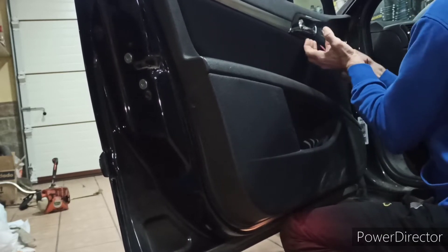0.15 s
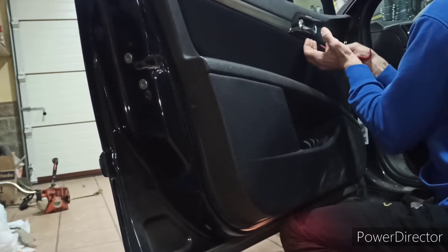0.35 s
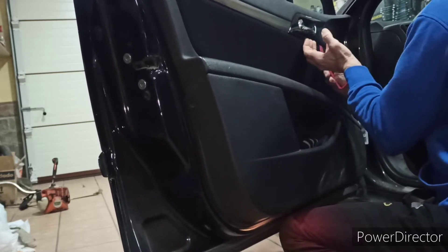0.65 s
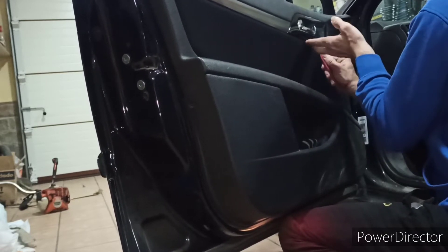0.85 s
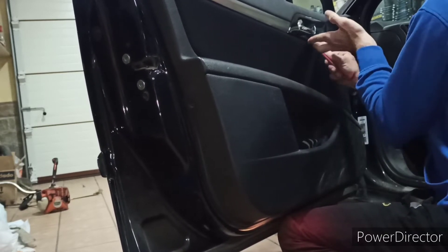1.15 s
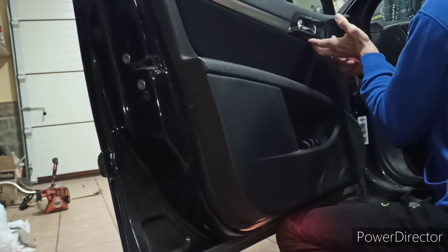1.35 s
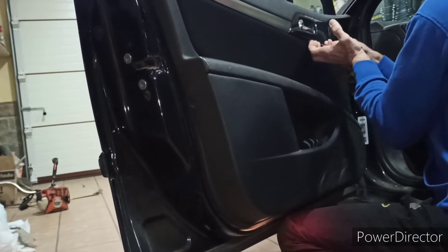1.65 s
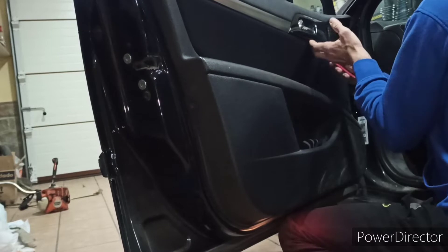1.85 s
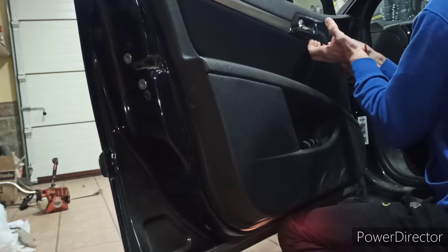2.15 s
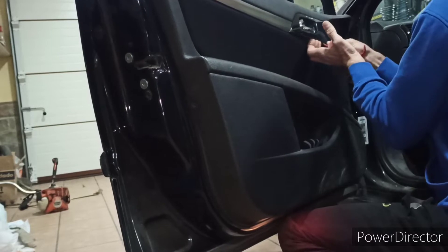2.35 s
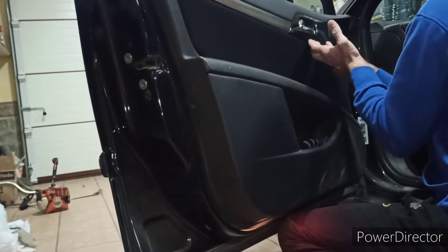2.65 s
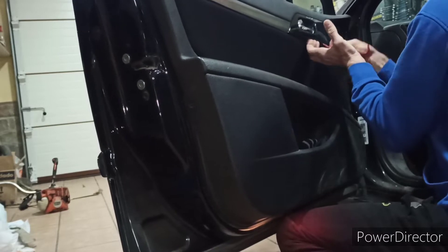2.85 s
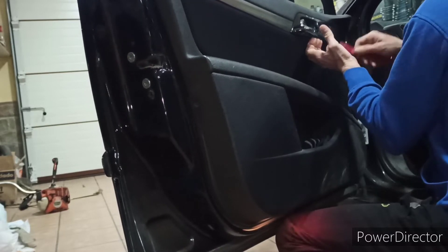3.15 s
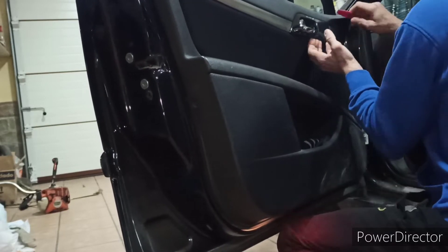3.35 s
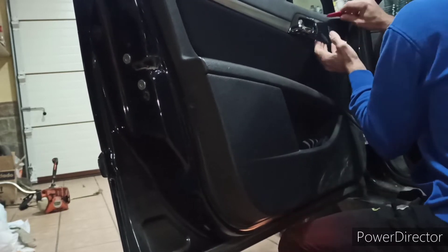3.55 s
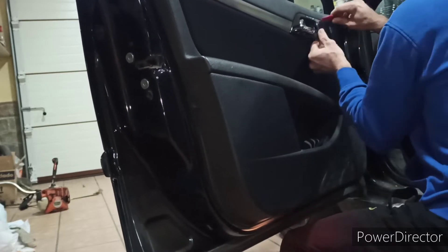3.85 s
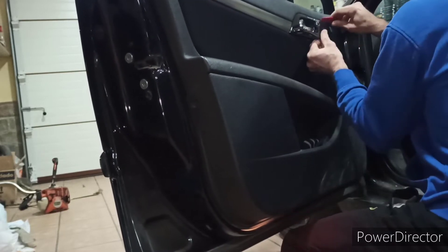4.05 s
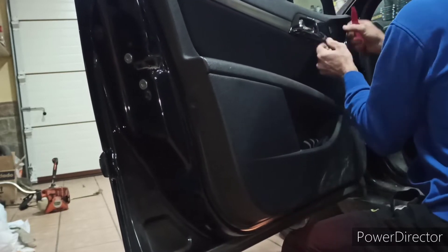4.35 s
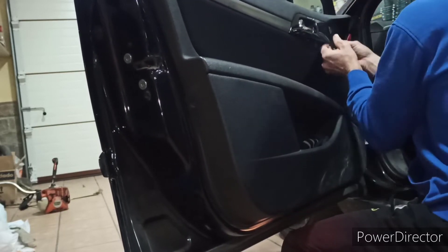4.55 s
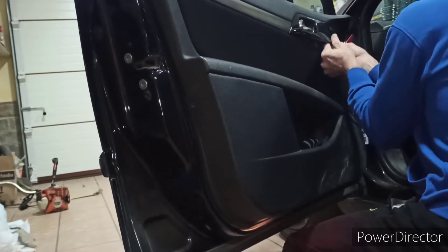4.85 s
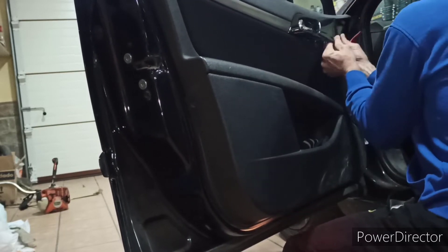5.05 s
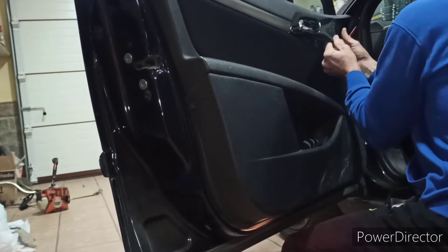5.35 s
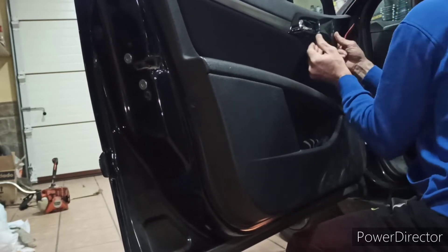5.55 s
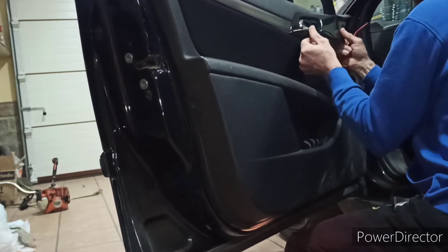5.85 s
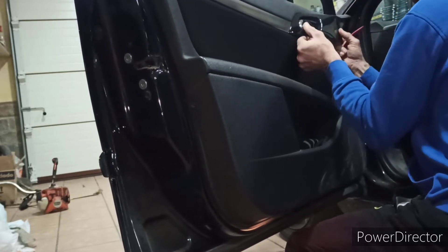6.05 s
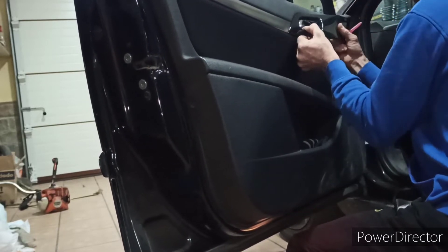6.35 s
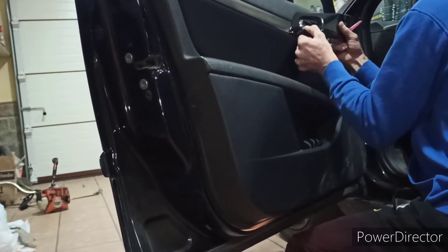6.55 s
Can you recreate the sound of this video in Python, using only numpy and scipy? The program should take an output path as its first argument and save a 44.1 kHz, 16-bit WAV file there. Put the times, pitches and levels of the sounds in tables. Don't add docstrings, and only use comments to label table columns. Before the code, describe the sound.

A tiled garage with faint steady hum and hiss; a phone about two metres from a car door. From 0 to 1.5 s, faint finger rubbing, soft knuckle bumps on the hollow panel and small taps. At 1.58 a loud sharp clip snap with a door thump, followed by a short rough scrape to 1.7. Light clicks at 2.0, a hard bright click at 2.27, then quiet taps and a tiny low squeak at 2.8. A crisp snap at 3.24, a soft sleeve swish at 3.45, small rattles near 3.8. At 4.04-4.09 a rapid run of clips cracks open. A higher squeak rises from 4.5 to 4.7. The loudest snaps come at 5.15 and 5.2, ringing plastic and booming door. Small rattles at 5.57 and 5.7, bumps at 6.2, a moderate last release at 6.29, then light rubbing to about 6.7. Hard walls give each hit a diffuse half-second tail.

```python
import sys
import numpy as np
from scipy import signal
from scipy.fft import rfft, irfft, next_fast_len
from scipy.io import wavfile
from scipy.ndimage import uniform_filter1d, minimum_filter1d, map_coordinates

SR = 44100
rng = np.random.default_rng(int(sys.argv[2]) if len(sys.argv) > 2 else 0)


def wrap_up_sound(samples):
    columns = np.atleast_2d(samples).T
    tamed = np.clip(columns, -1, 1)
    steps = np.round(tamed * 32767).astype(np.int16)
    wavfile.write(sys.argv[1], SR, steps)


def invert_db(level):
    return 10 ** (np.asarray(level, dtype=float) / 20)


N = 295029
LENGTH = 2048

# f/Hz, width/Hz, level/dB
DOOR_MODES = [(112, 49, -5.5), (188.7, 4.7, 5.5), (255.2, 21, 1), (335, 18, -8), (412, 23, 1)]
# f/Hz, width/Hz, level/dB
TRIM_MODES = [(504, 170, -2), (625, 107, 2.5), (770, 86, 2), (1080, 156, 2), (1185, 340, -2.5),
              (2180, 810, -16)]
# f/Hz, level/dB
CRACK_COLOUR = [(700, -1), (1300, 4.5), (2500, 1.5), (4500, 1), (6000, -2.5), (9000, -12), (12000, -16.5),
                (16000, -19)]


def unit(x):
    return x / np.sqrt(np.mean(np.abs(x) ** 2) + 1e-20)


def peak_one(x):
    return x / np.abs(x).max(axis=-1, keepdims=True)


def along(points, hz):
    f, v = np.transpose(points)
    return np.interp(np.log(hz + 1), np.log(f + 1), v)


def curves(rows, outside):
    s, *cols = np.transpose(rows)
    return [np.interp(np.arange(N) / SR, s, c, outside, outside) for c in cols]


def wobble(rate):
    knots = rng.standard_normal(int(N * rate / SR) + 4)
    return map_coordinates(knots, [np.arange(N) * rate / SR])


def filtered(x, response):
    n = x.shape[-1]
    m = next_fast_len(n + 1024, True)
    return irfft(rfft(x, m) * response(np.fft.rfftfreq(m, 1 / SR)), m)[..., :n]


def resonance(f, hz, width):
    return 1j * f * width / (hz * hz - f * f + 1j * f * width)


def body(modes):
    return lambda f: sum((-1) ** k * invert_db(db) * resonance(f, hz, w) for k, (hz, w, db) in enumerate(modes))


def spread(pair):
    # f/Hz, left-right likeness -1 to 1
    alike = [(30, 0.85), (60, 0.85), (130, 0.93), (290, 0.76), (640, 0.38), (1400, -0.25), (5000, 0.13),
             (15000, 0.02)]
    turn = lambda f: np.arccos(np.clip(along(alike, f), -1, 1)) / 2
    mid, side = filtered(pair, lambda f: np.sqrt(2) * np.array([np.cos(turn(f)), np.sin(turn(f))]))
    return np.array([mid + side, mid - side]) / np.sqrt(2)


def strokes(rows):
    build_up_db, fade_db_s = 12.5, 140
    s, build, *db = np.transpose(rows)[:, :, None]
    t = np.arange(0, N, 64) / SR
    ahead = (s - t) / np.clip(build, .002, 1)
    rise = invert_db(-build_up_db * np.abs(ahead)) * (ahead < 1)
    fall = invert_db(-fade_db_s * np.abs(t - s))
    shape = np.where(ahead > 0, rise, fall)
    return [np.interp(np.arange(N) / SR, t, np.sum(invert_db(d) * shape, axis=0)) for d in db]


def burst(s, life, colour):
    t = np.arange(LENGTH) / SR
    noise = rng.standard_normal((len(s), 3, len(t))).swapaxes(0, 1)
    ports = (noise[0] + 0.72 * noise[1:]) * (1 - np.exp(-t / 0.000083)) * np.exp(-t / life)
    ports = filtered(ports, colour)
    ports = ports / np.abs(ports).max(axis=(0, 2), keepdims=True)
    even = filtered(1. * (np.arange(len(t)) == 64), colour)
    even = even / np.linalg.norm(even) * np.linalg.norm(ports[0], axis=1, keepdims=True)
    return np.array([*ports, even])


def place(s, rows):
    spots = 4
    at = np.round(s * SR).astype(int) + np.arange(rows.shape[-1])
    spot = np.argsort(np.argsort(s[:, 0])) % spots
    add_up = lambda r, take: np.bincount(at[take].ravel(), r[take].ravel(), N + rows.shape[-1])[:N]
    direct = [add_up(r, spot >= 0) for r in rows[:2]]
    return np.array(direct + [add_up(rows[2], spot == k) for k in range(spots)])


def background():
    # f/Hz, level/dB per Hz
    hum = [(15, -35.5), (25, 7.5), (43, -1), (103, 13), (307, 1.5), (421, 0.5), (812, -4), (2150, -16.5),
           (4570, -13.5), (5290, -17.5), (7440, -22.5), (8400, -23.5), (10900, -48), (18500, -120)]
    # f/Hz, level/dB per Hz
    hiss = [(11500, -22.5), (15500, -19)]
    air = filtered(rng.standard_normal((2, N)), lambda f: invert_db(along(hum[:-2] + hiss, f)))
    drift_db = 1.1 * wobble(5) + .7 * wobble(13)
    return invert_db(-57.5 + drift_db) * unit(spread(air))


def garage(x, gap=.003):
    # f/Hz, t60/s
    t60 = [(100, 0.58), (260, 0.56), (700, 0.53), (1840, 0.6), (4850, 0.54), (12800, 0.31)]
    size, long = 14000, 28000
    out = np.zeros((2, N + 2 * SR))
    hz, t, z = signal.stft(rng.standard_normal((N // size + 1, 2, long)), SR, nperseg=256)
    tails = signal.istft(z * invert_db(-60 * t / along(t60, hz)[:, None]), SR, nperseg=256)[1]
    tails = tails * (1 - np.exp(-np.arange(tails.shape[-1]) / SR / 0.00022))
    tails = tails / np.linalg.norm(tails, axis=2, keepdims=True)
    late = round(gap * SR)
    for k in range(len(tails)):
        own = tails[(k + np.arange(len(x))) % len(tails)]
        wet = signal.fftconvolve(x[:, None, k * size:(k + 1) * size], own, axes=2).sum(axis=0)
        out[:, k * size + late:][:, :wet.shape[1]] += wet
    return spread(out[:, :N])


def swishes():
    # t/s of the strongest pull, build-up/s, level/dB
    brushes = [
        (0.23, 0.045, -84),
        (1.2, 0.056, -84),
        (3.435, 0.042, -65.5),
        (3.65, 0.071, -66),
        (3.72, 0.032, -76),
        (4.088, 0.022, -49),
        (5.535, 0.1, -61),
    ]
    # f/Hz, level/dB
    sleeve = [(5200, -25), (6300, -8.5), (7400, -4), (8000, -10), (9000, -18.5)]
    cloth = rng.standard_normal(N) * invert_db(8.7 * wobble(180))
    return strokes(brushes)[0] * unit(filtered(cloth, lambda f: invert_db(along(sleeve, f))))


def rubbing():
    # t/s of the strongest pull, build-up/s, rub level/dB, rustle level/dB
    pulls = [(0.0, .05, -54.5, -63), (0.098, 0.093, -58.5, -55), (0.235, 0.054, -57, -72),
             (0.5, 0.063, -61, -90), (0.758, 0.049, -54.5, -85), (1.07, 0.0077, -48, -53.5),
             (1.2, 0.23, -58, -59), (1.42, 0.0042, -46.5, -69.5), (1.625, 0.052, -30, -26.5),
             (1.665, 0.043, -26.5, -28), (2.03, 0.045, -41.5, -53), (2.09, 0.043, -50.5, -64),
             (2.22, 0.11, -61.5, -65.5), (2.7, 0.34, -55, -66), (2.844, 0.087, -45.5, -49.5),
             (2.91, 0.0053, -55, -78), (3.03, 0.02, -54, -72.5), (3.518, 0.13, -57.5, -58.5),
             (3.7, 0.096, -66, -57), (3.824, 0.056, -55, -50.5), (4.03, 0.058, -60, -56),
             (4.62, 0.051, -69, -65), (4.78, 0.19, -62, -52), (5.05, 0.25, -52.5, -58),
             (5.41, 0.041, -48, -61), (5.49, 0.03, -69, -51.5), (5.8, 0.19, -82.5, -64),
             (6.044, 0.21, -72.5, -57), (6.204, 0.035, -62.5, -52), (6.5, 0.12, -60, -58),
             (6.69, 0.024, -42, -45)]
    heavy = rng.standard_normal(N) * invert_db(3.4 * wobble(70))
    fine = rng.standard_normal(N) * invert_db(2.6 * wobble(140))
    heavy = unit(filtered(heavy, lambda f: body(TRIM_MODES)(f) + body(DOOR_MODES)(f)))
    fine = unit(filtered(fine, lambda f: invert_db(along(CRACK_COLOUR, f))))
    rub, rustle = strokes(pulls)
    return invert_db(-2.5) * rub * heavy + invert_db(-8.0) * rustle * fine


def squeaks():
    # t/s, slip rate f/Hz, level/dB
    slips = [
        [(2.775, 813, -67), (2.8, 870, -57), (2.83, 1037, -49.5), (2.86, 1050, -68)],
        [(4.46, 1643, -77), (4.49, 1760, -61.5), (4.53, 1953, -56.5), (4.57, 2250, -45), (4.61, 2450, -41.5),
         (4.65, 2506, -39.5), (4.69, 2640, -40), (4.72, 2646, -58), (4.93, 2765, -68)],
    ]
    # f/Hz, level/dB
    thinnings = [
        [(800, -2), (1100, -5)],
        [(1700, 19), (2250, 5.5), (2450, 0), (2750, -6)],
    ]
    # f/Hz, level/dB
    edge = [(700, 8), (2850, 3), (3100, -26), (3350, -5), (4500, -1.5), (4950, -5.5), (5300, -14),
            (6000, -11), (6600, -7.5), (7500, -21.5), (8500, -18.5), (12000, -13)]
    wander, press = 0.139, .3
    out = np.zeros(N)
    scrape = unit(filtered(rng.standard_normal(N), lambda f: resonance(f, 3800, 900) ** 2 + 0.084))
    for rows, thinning in zip(slips, thinnings):
        hz, db = curves(rows, -200)
        over_db = along(thinning, np.abs(hz))
        unsteady = wander * invert_db(press * (db - db.max()))
        phase = 2 * np.pi * np.cumsum(hz * (1 + unsteady * np.tanh(wobble(600)))) / SR
        over = np.sin(2 * phase) + invert_db(-5) * np.sin(3 * phase) + invert_db(-4) * np.sin(4 * phase)
        flutter_db = 2.2 * wobble(250)
        tone = np.sin(phase) + invert_db(over_db) * over
        out += invert_db(db + flutter_db) * (tone + 1.8 * unsteady * scrape)
    return filtered(out, lambda f: invert_db(along(edge, f)))


def pings():
    # t/s, level/dB, f/Hz, life/ms
    tongues = [
        (5.181, -26, 13660, 11),
        (2.2665, -17.5, 2400, 2.3),
        (5.182, -21, 4600, 3),
        (3.2378, -20, 4200, 1),
        (0.358, -48, 420, 8),
        (2.82, -50, 2000, 4),
        (4.0445, -29, 9900, 5),
        (2.268, -25, 7500, 5.6),
        (5.1455, -25.5, 7700, 3.4),
    ]
    s, db, hz, ms = np.transpose(tongues)[:, :, None]
    t = np.arange(LENGTH) / SR
    ring = invert_db(db) * np.sin(2 * np.pi * hz * t) * np.exp(-t * 1000 / ms) * (1 - np.exp(-t / .0006))
    return place(s, np.array([ring, ring, invert_db(-3) * ring]))


def ticks():
    # t/s, peak of the top level/dB, peak of the lower sizzle level/dB
    releases = [(0.579, -44, -53), (1.034, -55, -53), (1.154, -53, -50.5), (1.197, -53, -58),
                (1.422, -56, -52.5), (1.445, -45, -60.5), (1.5793, -25, -22), (1.9998, -68, -58),
                (2.0246, -56, -44), (2.269, -34.5, -22.5), (2.6254, -67, -61), (2.9085, -51, -38.5),
                (3.238, -32.5, -56), (3.811, -40.5, -42), (4.024, -44, -52), (4.04, -28, -46.5),
                (4.0437, -12.5, -19), (4.047, -27, -31), (4.082, -31, -29.5), (4.0896, -31, -50),
                (4.312, -61, -52), (4.8347, -49.5, -51), (4.964, -50, -54), (5.1437, -16, -17.5),
                (5.1813, -19, -19.5), (5.1843, -20.5, -21.5), (5.199, -31, -28), (1.777, -49, -62),
                (4.938, -51, -58), (1.659, -51.5, -33), (5.5708, -46.5, -51.5), (6.277, -41, -42)]
    # f/Hz, level/dB
    tip_colour = [(8500, -49.5), (11500, -2.5), (13700, -3.5), (16000, -3)]
    # f/Hz, level/dB
    sizzle_colour = [(4500, -33.5), (6200, -9), (7500, -8.5), (8300, -12), (9500, -15.5), (12000, -37.5)]
    s, db, sizzle_db = np.transpose(releases)[:, :, None]
    tip = invert_db(db + 7.5) * burst(s, 0.0018, lambda f: invert_db(along(tip_colour, f)))
    sizzle = invert_db(sizzle_db + 6.0) * burst(s, 0.0021, lambda f: invert_db(along(sizzle_colour, f)))
    return place(s, tip + sizzle)


def contacts():
    # t/s, peak level/dB, trim ring f/Hz, crack level/dB, life/ms
    snaps = [(1.579, -9.5, 950, -8.5, 2.5), (3.2415, -22.5, 700, -16, 0.35), (4.044, -21, 840, -1, 3.8),
             (4.0478, -19.5, 1000, -1.5, 3.6), (4.069, -22.5, 815, -7, 19), (4.089, -25.5, 760, 1, 7.5),
             (5.1435, -14.5, 1500, -5, 2.1), (5.15, -9.5, 1030, -10, 2.4), (5.1575, -15.5, 518, -32.5, 4.5),
             (5.2, -10, 694, -15, 3.6), (5.2066, -5.5, 570, -37, 2.7), (6.2905, -24, 996, -23, 7.2),
             (6.292, -18.5, 620, -25, 6.6)]
    clicks = [(0.064, -44, 845, -18, 6.2), (1.312, -53, 686, -6, 2.3), (1.444, -32.5, 616, -1.5, 1.9),
              (2.0, -32.5, 790, -10.5, 7.6), (2.266, -6.5, 1450, -8, 0.89), (2.273, -15.5, 800, -28.5, 1.7),
              (2.778, -38, 745, -16, 1), (2.909, -29, 830, -9.5, 2.4), (3.2378, -18.5, 1780, -18, 1.7),
              (3.766, -35.5, 506, -23, 8.9), (3.767, -35, 990, -27, 4.6), (3.793, -38, 565, -25, 7.3),
              (3.8045, -28.5, 536, -20, 4.1), (3.811, -27, 1090, -10.5, 3.3),
              (4.938, -41.5, 1150, -7.5, 2.5), (4.985, -43, 1230, -11.5, 9), (5.572, -39.5, 875, -5, 3.2),
              (5.579, -35.5, 870, -28, 5.8), (5.6935, -33, 937, -20, 4.8), (5.7, -32, 980, -27.5, 1.9),
              (5.707, -49, 895, -24, 3.2), (6.2765, -37, 2350, -4, 11)]
    # t/s, peak level/dB, trim ring f/Hz, crack level/dB
    taps = [(0.591, -39, 595, -32), (1.034, -63, 579, 1), (1.423, -38.5, 906, -4.5), (1.456, -35, 504, -24),
            (1.482, -35, 433, -39), (2.0244, -36.5, 1713, -10.5), (2.629, -67.5, 533, 5),
            (2.674, -48, 528, -12), (2.6939, -39, 537, -17.5), (2.869, -45, 695, -9),
            (2.917, -35, 420, -32), (3.004, -42, 477, -24), (3.025, -39.5, 905, -24),
            (3.777, -37.5, 520, -29), (3.793, -43, 1015, -30), (4.889, -48, 675, -3),
            (4.962, -48, 1230, -12), (5.575, -37.5, 2460, -18), (6.283, -31.5, 500, -14)]
    # t/s, peak level/dB, trim ring f/Hz, crack level/dB
    thuds = [(0.208, -45.5, 503, -11), (0.226, -44, 705, -17), (0.607, -48.5, 810, -6),
             (0.357, -53.5, 454, -43), (0.371, -46, 270, -40), (0.578, -37.5, 800, -7.5),
             (0.718, -41, 557, -33), (0.733, -44, 300, -34), (0.742, -49, 547, -34),
             (0.76, -46.5, 543, -32), (0.787, -44, 262, -28), (0.806, -47.5, 1635, -25),
             (0.809, -37.5, 844, -21.5), (1.075, -53, 640, -18.5), (1.086, -44, 694, -30),
             (1.094, -37.5, 770, -32.5), (1.103, -38.5, 770, -16), (1.115, -41, 590, -33),
             (1.14, -43.5, 790, -28.5), (1.106, -43, 244, -29.5), (2.154, -38.5, 770, -35),
             (2.973, -35.5, 468, -16.5), (3.034, -36.5, 488, -30), (3.987, -38, 820, -19.5),
             (4.311, -40, 520, -3), (4.438, -42, 710, -10), (4.5827, -30.5, 440, -14),
             (4.595, -43, 188, -28), (4.62, -53, 420, -30), (4.665, -52, 150, -28),
             (4.688, -53, 480, -29.5), (4.837, -48, 793, -2), (4.873, -43, 830, -27),
             (6.187, -36, 486, -14), (6.197, -33.5, 193.5, -32.5), (6.21, -37, 170, -34)]
    rings = [(1.427, -41, 1850, -35, 3.7), (1.433, -40.5, 616, -34.5, 6.9), (1.4445, -29, 1770, -15, 2),
             (1.4455, -29.5, 980, -30, 6.9), (1.446, -31, 475, -29, 4.7), (1.481, -34, 940, -31.5, 7),
             (1.496, -41, 390, -32, 4.6), (1.5797, -4.5, 4060, -9.5, 0.47), (1.5885, -17, 490, -33, 3.6),
             (1.597, -26, 620, -27, 2.4), (1.605, -26, 600, -30, 3.5), (1.614, -32, 900, -15, 3.5),
             (1.628, -21, 341, -30, 16), (1.668, -19, 770, -28, 3), (1.68, -26, 350, -29, 8.8),
             (2.003, -29, 576, -25, 2.6), (2.024, -33, 820, -16, 4), (2.07, -34.5, 854, -20, 4.3),
             (2.2672, -10.5, 1010, -9.5, 4.5), (2.281, -21, 980, -27, 2.8), (2.382, -33, 970, -32, 3),
             (2.694, -36.5, 850, -17, 1.6), (3.026, -35.5, 1230, -17.5, 1.9), (3.043, -38.5, 400, -38, 4.4),
             (3.2393, -19.5, 3300, -22.5, 0.4), (3.2442, -27.5, 636, -27, 1.3),
             (3.2466, -21, 900, -19, 1.2), (3.805, -34, 1030, -36, 6), (3.8145, -29.5, 500, -35, 6),
             (3.823, -36, 560, -32, 3.4), (3.88, -44, 1650, -32, 3), (4.103, -24.5, 446, -25, 2.4),
             (1.5817, -2.5, 835, -20.5, 0.8), (1.638, -24, 624, -25.5, 5), (4.602, -39.5, 135, -34, 8),
             (5.159, -13.5, 538, -27.5, 5), (5.71, -42, 900, -32, 3), (6.2773, -35, 2900, -25, 1.5),
             (5.1445, -7.5, 1001, -22, 6.4), (5.148, -9, 475, -14, 4.6), (5.1811, -15.5, 2100, -4, 6.8),
             (5.189, -15.5, 2030, -13.5, 2.2), (5.22, -21.5, 318, -27, 4.2), (5.228, -17.5, 640, -30, 4.4),
             (5.573, -38, 3830, -27, 4), (5.585, -43, 866, -32, 4), (5.694, -42, 3880, -25.5, 4.3),
             (6.347, -33.5, 604, -17.5, 4.2)]
    taps = [row + (9.2 * (600 / row[2]) ** .5,) for row in taps]
    thuds = [row + (4.75,) for row in thuds]
    kinds = [(snaps, -12.5, -4.5), (clicks, -36.5, -4.5), (taps, -23, -4.5), (thuds, -8.5, -4.5),
             (rings, -38.5, -21.5)]
    return np.transpose([row + tuple(shares) for rows, *shares in kinds for row in rows])[:, :, None]


def knocks():
    s, db, hz, crack_db, ms, thump_db, body_db = contacts()
    t = np.arange(LENGTH) / SR
    life = np.clip(ms, .5, 40) / 1000
    blow = t / .00015 * np.exp(-t / 0.000085)
    swell = lambda f: resonance(f, hz, 2.2 * hz)
    struck = lambda f: resonance(f, hz, 0.34 / life) * life / 0.0017
    trim = peak_one(filtered(blow, lambda f: swell(f) * (struck(f) + invert_db(body_db) * body(TRIM_MODES)(f))))
    door = peak_one(filtered(blow, lambda f: body(DOOR_MODES)(f) * resonance(f, 340, 650)))
    trim, door = 0.92 * trim, invert_db(thump_db + 4.0) * door
    crack = invert_db(crack_db + 8.0) * burst(s, 2.28 * life, lambda f: invert_db(along(CRACK_COLOUR, f)))
    smooth = lambda x, size: uniform_filter1d(uniform_filter1d(x, size), size)
    blur = lambda x, size: np.abs(smooth(np.abs(rfft(x)) ** 2, size))
    power = blur(trim, size=17) + blur(door, size=3) + blur(crack[2], size=3)
    feed = np.roll(irfft(np.sqrt(power)), 200, axis=1)
    return place(s, invert_db(db) * np.array([crack[0] + trim + door, crack[1] + trim + door, feed]))


def scene():
    # f/Hz, depth
    scatter = [(300, 0.24), (900, 0.36), (2000, 0.54), (7000, 0.5)]
    # f/Hz, level/dB
    shadow = [(4000, -1), (6000, 2), (8000, -0.5), (14000, -4)]
    left, right, *feeds = knocks() + ticks() + pings()
    friction = rubbing() + squeaks() + swishes()
    far = invert_db(-4.5) * garage(np.array([feeds[0] + friction, *feeds[1:]])) + background()
    t = np.arange(LENGTH) / SR
    echoes = unit(rfft(rng.standard_normal(LENGTH) * t * np.exp(-t / .002)))
    path = lambda f: np.interp(f, np.fft.rfftfreq(LENGTH, 1 / SR), echoes)
    turn = lambda f: np.array([[1], [-1]]) * along(scatter, f) * path(f)
    near = filtered(np.array([left, right]), lambda f: np.exp(turn(f)))
    left, right = near + filtered(friction, lambda f: np.exp(1j * 2.6 * turn(f).imag))
    left = np.roll(left, 4)
    left = filtered(left, lambda f: invert_db(0.73 + along(shadow, f)))
    return np.array([left, right]) + far


def thinned(x):
    mask_db, mask_grows, quiet_db = -55, .19, -55
    attack_db, attack_s = 19.5, .008
    treble = np.abs(uniform_filter1d(np.mean(np.diff(x, prepend=0) ** 2, axis=0), size=128)) + 1e-14
    jump = treble > invert_db(2 * attack_db) * np.roll(uniform_filter1d(treble, size=256), 300)
    attack = uniform_filter1d(1. - minimum_filter1d(1. - jump, int(attack_s * SR)), size=128)
    hz, _, z = signal.stft(x * (1 - attack), SR, nperseg=2048)
    level = np.linalg.norm(z, axis=1, keepdims=True)
    limit = invert_db(mask_db) * level * (level / invert_db(quiet_db)) ** mask_grows
    masked = np.abs(uniform_filter1d(np.abs(z) ** 2, size=3, axis=1)) < limit ** 2
    z = z * ~(masked & (hz[:, None] > 8500))
    return x * attack + signal.istft(z, SR, nperseg=2048)[1][:, :N]


def band_limit(x):
    return signal.sosfilt(signal.butter(12, 16630, fs=SR, output="sos"), x)


def record(dry):
    # f/Hz, level/dB
    tone_curve = [(40, -11), (120, -3), (400, 0.5), (4700, 0.5), (5000, -2), (5700, 0.5), (6500, 6.5), (7400, 9.5),
                  (8450, 4.5), (8750, -11.5), (11450, -11.5), (11650, 0.5), (13700, 3.5), (15450, 2), (15600, -21),
                  (16500, -24.5), (16700, -86)]
    # f/Hz, width/Hz, depth 0-1
    notches = [(4944, 110, 0.4), (5760, 160, 0.7)]
    mesh = lambda f: np.prod([1 - depth * np.abs(resonance(f, hz, w)) for hz, w, depth in notches], axis=0)
    x = filtered(dry, lambda f: invert_db(along(tone_curve, f)) * mesh(f))
    keep = np.exp(-1 / (0.056 * SR))
    power = signal.lfilter([1 - keep], [1, -keep], np.mean(x ** 2, axis=0))
    x = x * (1 + power / invert_db(-25.5)) ** -.22
    x = x / (1 + np.abs(x / .95) ** 4) ** .25
    x = signal.lfilter(*signal.butter(2, 42 / SR * 2, "high"), x)
    x = thinned(x)
    return band_limit(x)


dry = scene()
out = record(dry)
wrap_up_sound(out)
```